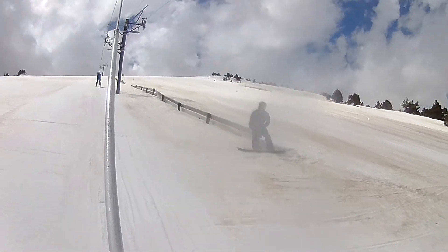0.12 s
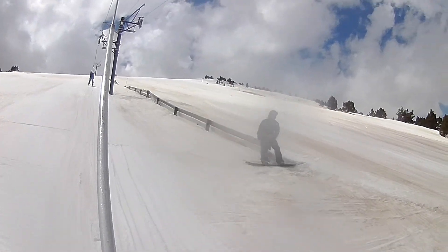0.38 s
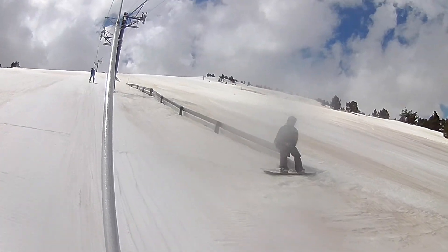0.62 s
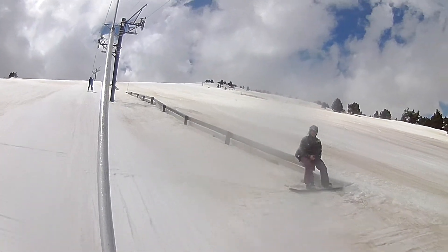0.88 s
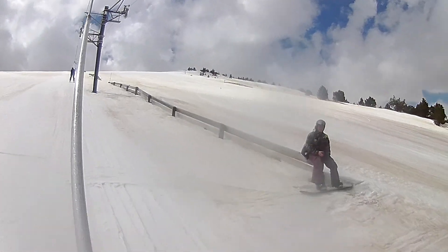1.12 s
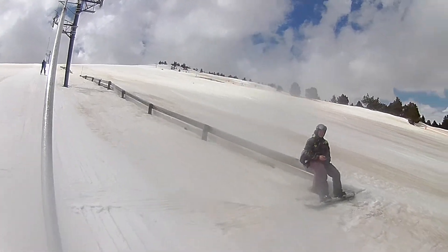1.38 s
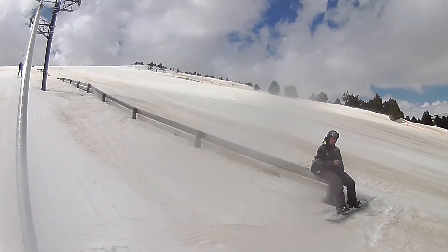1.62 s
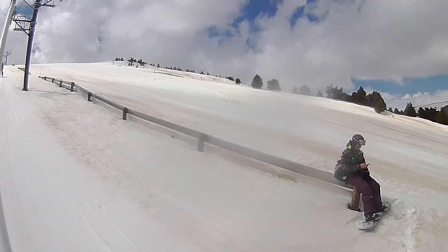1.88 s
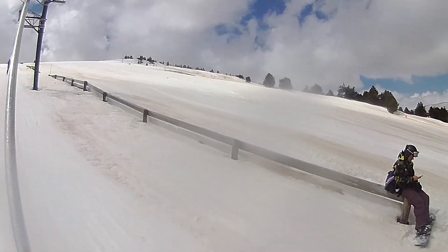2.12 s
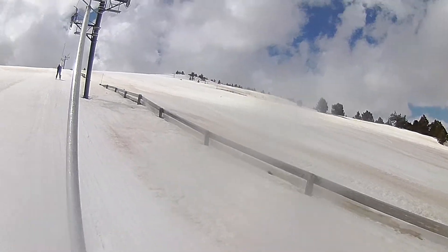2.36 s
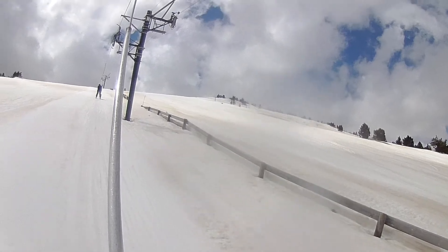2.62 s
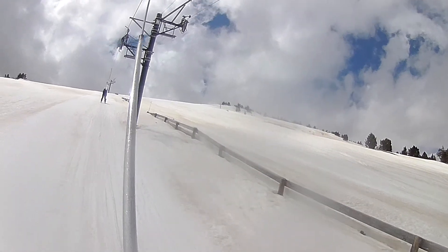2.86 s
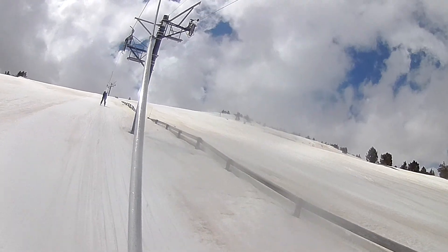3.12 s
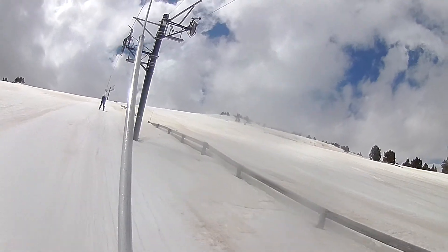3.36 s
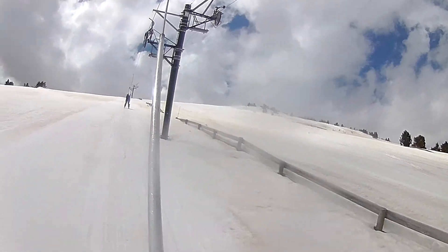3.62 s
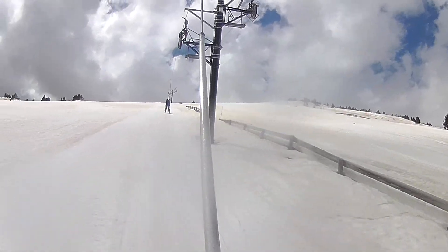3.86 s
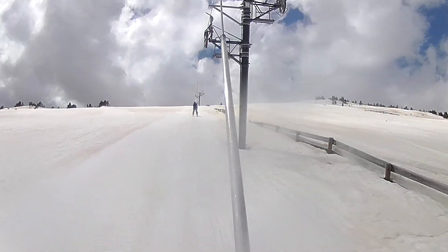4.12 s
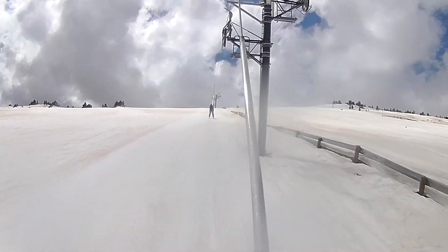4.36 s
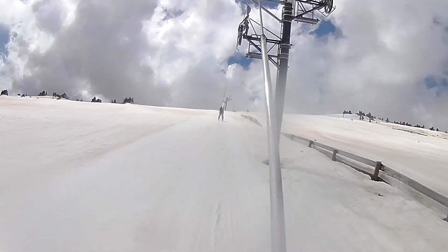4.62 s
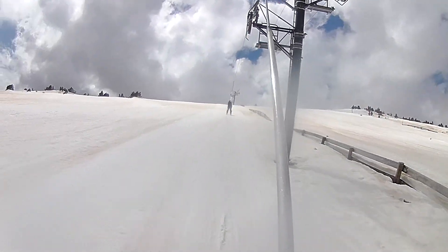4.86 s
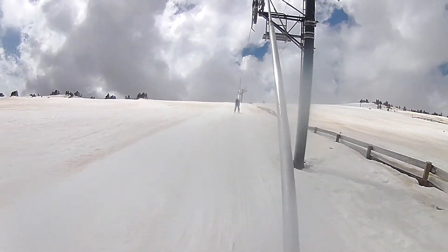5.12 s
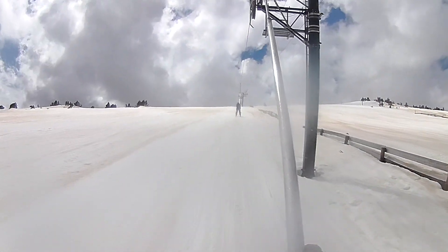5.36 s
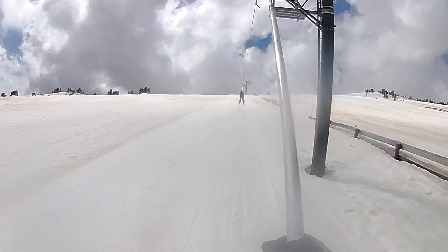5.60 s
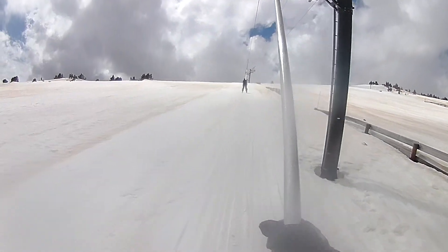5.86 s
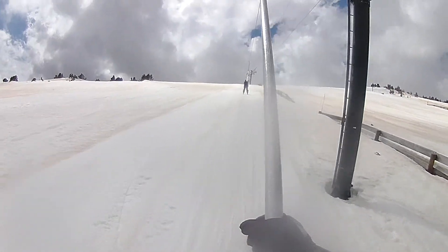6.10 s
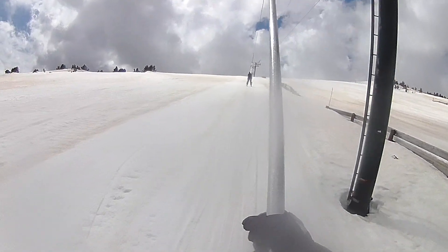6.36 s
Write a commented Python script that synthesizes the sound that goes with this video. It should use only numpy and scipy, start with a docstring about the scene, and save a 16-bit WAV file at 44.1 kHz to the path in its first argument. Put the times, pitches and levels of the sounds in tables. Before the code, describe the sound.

Close, bright snow hiss and scraping continue under a thin metallic tremble. Light rattles come early, sparser ones follow, then a sharp cluster of clanks, a calmer glide and finally a loud rush of rattling, grinding and squeaking near a lift pylon. Behind it lie a faint low lift hum and wide outdoor wash, heard through a housed helmet microphone.

```python
"""A snowy slope under a drag lift: a skier is towed uphill by its metal pole, heard from a housed helmet camera.
The far lift is a narrow noise hum over rumble; skis are shaped noise with grain clicks, plus dull ice knocks.
Friction is clicks in sliding resonances and narrow-noise squeaks.
The loose telescopic pole rattles and clanks, violently near a pylon: strikes and chatter drive decaying modes.
The housing dulls the bass of skis and pole; the treble's stereo width flickers over a wide wash of the slope."""
import sys
import numpy as np
from scipy import signal
from scipy.fft import rfft, irfft
from scipy.io import wavfile
from scipy.ndimage import uniform_filter1d

SR = 44100
rng = np.random.default_rng(int(sys.argv[2]) if len(sys.argv) > 2 else 0)


def store_pcm(level_fs):
    """Save levels as 16-bit WAV."""
    pcm = np.round(np.clip(level_fs, -1, 1) * 32767).astype(np.int16)
    wavfile.write(sys.argv[1], SR, np.atleast_2d(pcm).T)


def voltage_ratio(level):
    """Linear amplitude factor for a level in decibels (scalar or array-like)."""
    return 10 ** (np.asarray(level, float) / 20)


N = 285768


def evened(x):
    """Scales x to rms 1."""
    return x / np.sqrt(np.mean(x ** 2) + 1e-20)


def read(points, hz):
    """Interpolates (Hz, dB) points over log frequency."""
    f, value = np.transpose(points)
    return np.interp(np.log(hz + 1), np.log(f + 1), value)


def add(mix, s, sound):
    """Adds sound into mix at s seconds, cut at the end."""
    part = mix[..., round(s * SR):][..., :sound.shape[-1]]
    part += sound[..., :part.shape[-1]]


def follow(rows, column):
    """One column of a curve for every sample; the end values hold outside it."""
    rows = np.array(rows)
    return np.interp(np.arange(N) / SR, rows[:, 0], rows[:, column])


def clicks(per_s, spread_db):
    """Sparse clicks of random sign; a few are large."""
    size = voltage_ratio(spread_db * np.minimum(rng.exponential(1, N), 4))
    sign = rng.choice([-1., 1.], N)
    return size * sign * (rng.random(N) < per_s / SR)


def struck(modes):
    """Impulse response of decaying modes with a soft start, energy 1; neighbours swing opposite ways."""
    t = np.arange(6000) / SR
    ring = np.zeros(len(t))
    for k, (hz, db, t60_s) in enumerate(modes):
        ring += (-1) ** k * voltage_ratio(db - 60 * t / t60_s) * np.sin(2 * np.pi * hz * t)
    ring = ring * (1 - np.exp(-t / 0.000076))
    return ring / np.linalg.norm(ring)


def coloured(x, spectrum, patchy_db=0., flicker_db=0.):
    """Gives x a spectrum, with drifting patches and a flicker shared by all bands; rms 1."""
    hz, t, z = signal.stft(x, SR, nperseg=512, noverlap=384)
    across_bands = uniform_filter1d(rng.standard_normal(z.shape), 8, 0)
    patches = evened(uniform_filter1d(across_bands, 20, 1))
    flicker = evened(uniform_filter1d(rng.standard_normal(len(t)), 8))
    z = z * voltage_ratio(read(spectrum, hz)[:, None] + patchy_db * patches + flicker_db * flicker)
    return evened(signal.istft(z, SR, nperseg=512, noverlap=384)[1][:N])


def resonate(x, hz, width_hz):
    """A moving resonance of gain 1: shift down, smooth, shift back."""
    turn = np.exp(2j * np.pi * np.cumsum(hz) / SR)
    r = np.exp(-np.pi * width_hz / SR)
    return 2 * (turn * signal.lfilter([1 - r], [1, -r], x / turn)).real


# Far drive of the lift. One row: centre in Hz, half-width at half amplitude in Hz, rms level in dB.
DRIVE_HUM = (100.5, 18.7, -74)
RUMBLE_DB = -83.5


def lift():
    """Noise in a narrow low resonance wavers as a hum, over faint rumble; the two channels are unrelated."""
    hz, width_hz, db = DRIVE_HUM
    f = np.fft.rfftfreq(N, 1 / SR)
    hum_noise, rumble_noise = rfft(rng.standard_normal((2, 2, N)))
    hum = evened(irfft(hum_noise / (1 + ((f - hz) / width_hz) ** 2), N))
    rumble = evened(irfft(rumble_noise / (1 + (f / 70) ** 3), N))
    return voltage_ratio(db) * hum + voltage_ratio(RUMBLE_DB) * rumble


# Wash of the slope. Each row: frequency in Hz, relative density in dB per Hz.
OPEN_AIR_SPECTRUM = [(120, -25), (300, -12.5), (700, -2), (1300, -1.5), (2300, -6), (3500, -13),
                     (6000, -40)]
OPEN_AIR_DB = -59.5


def open_air():
    """Steady shaped noise of the open slope, for the side signal."""
    wash = coloured(rng.standard_normal(N), OPEN_AIR_SPECTRUM, patchy_db=1.5, flicker_db=0.9)
    return voltage_ratio(OPEN_AIR_DB) * wash


# The ride, also followed by the pole.
# Each row: time in s, hiss rms in dB, crunch rms in dB, drive of the pole's tremble in dB.
RIDE = [(0.0, -43.5, -47, -42), (0.24, -43.5, -47, -47.5), (0.41, -41.5, -50, -45.5),
        (0.6, -46.5, -48.5, -50.5), (0.81, -41.5, -46, -46.5), (0.94, -40, -51.5, -46),
        (1.04, -51.5, -51, -52.5), (1.22, -46.5, -52.5, -52.5), (1.45, -42, -46, -44.5),
        (1.75, -43.5, -46, -45.5), (2.11, -45.5, -49.5, -55), (2.5, -40.5, -47.5, -46.5),
        (2.94, -42.5, -51, -48.5), (3.16, -40.5, -49, -71), (3.32, -40, -47, -57),
        (3.47, -40.5, -43.5, -50), (3.58, -42.5, -48.5, -48.5), (3.79, -40.5, -50.5, -50.5),
        (4.37, -42, -48, -44), (5.03, -43, -49.5, -45.5), (5.7, -43, -49.5, -43.5), (5.93, -39, -43, -39),
        (6.012, -37, -36.5, -29.5), (6.14, -46, -52.5, -36.5), (6.25, -48, -44, -41),
        (6.36, -51, -46.5, -37), (6.48, -33.5, -44, -32.5)]
# Fine grains, steel edges, packed snow under the ski.
# Each row: frequency in Hz, relative density in dB per Hz.
HISS_SPECTRUM = [(2240, -25.5), (3800, -12.5), (4280, -18.5), (5650, -8), (6220, -5), (7120, -10.5),
                 (8770, -9), (10300, -12), (11800, -2), (13200, -11.5), (14700, -7.5), (15700, -21.5)]
SCRAPE_SPECTRUM = [(1800, -25), (2400, -10), (2900, 2), (3600, -1.5), (4300, -1), (5200, -14)]
CRUNCH_SPECTRUM = [(88, -63), (150, -20), (334, -13), (472, -8), (699, -5.5), (965, -4.5), (1450, 0.5),
                   (2600, -5), (3380, -18), (5720, -120)]
USUAL_CRUNCH_DB, USUAL_TREMBLE_DB = -48, -46
# edges scrape harder when snow crunches and the ride shakes: dB gained per dB
SCRAPE_DB, SCRAPE_PER_CRUNCH, SCRAPE_PER_TREMBLE = -53, 0.54, 0.7


def snow():
    """Smooth sliding noise with breaking grains in it: bright hiss, scrape and a duller crunch."""
    grains = evened(clicks(per_s=3000, spread_db=4.0))
    hiss = coloured(rng.standard_normal(N) + 0.43 * grains, HISS_SPECTRUM, patchy_db=1.37, flicker_db=1.18)
    scrape = coloured(rng.standard_normal(N) + 0.43 * grains, SCRAPE_SPECTRUM, patchy_db=0.1, flicker_db=1.5)
    crunch = coloured(rng.standard_normal(N) + 0.79 * grains, CRUNCH_SPECTRUM, patchy_db=1.04, flicker_db=0.9)
    hiss_db, crunch_db, tremble_db = (follow(RIDE, column) for column in (1, 2, 3))
    scrape_db = (SCRAPE_DB + SCRAPE_PER_CRUNCH * (crunch_db - USUAL_CRUNCH_DB)
                 + SCRAPE_PER_TREMBLE * (tremble_db - USUAL_TREMBLE_DB))
    return voltage_ratio(hiss_db) * hiss + voltage_ratio(crunch_db) * crunch + voltage_ratio(scrape_db) * scrape


# Ski edges on lumps of ice. Each row: start in s, level before decay in dB, frequency in Hz.
ICE_LUMPS = [(0.057, -31.5, 596), (0.093, -26, 1410), (0.616, -33, 1330), (1.09, -38, 1640),
             (1.634, -32, 1110), (2.584, -33, 1680), (5.874, -28, 2300), (5.915, -22.5, 1790),
             (5.975, -28, 430), (5.992, -32, 340)]


def lumps():
    """Ski edges hit ice: each knock is a sine with a fast rise and decay."""
    out, t = np.zeros(N), np.arange(800) / SR
    for s, db, hz in ICE_LUMPS:
        decay = voltage_ratio(db - 60 * t / .011)
        rise = np.minimum(t / .0005, 1)
        add(out, s, decay * rise * np.sin(2 * np.pi * hz * t))
    return out


# Hollow grinding strokes. Each row: start in s, length in s, rms level at the crest in dB,
# share of the length spent swelling, start pitch in Hz, end pitch in Hz.
GRIND_STROKES = [(2.81, 0.18, -47.5, 0.48, 3300, 3500), (5.892, 0.1, -33.5, 0.8, 1800, 1110),
                 (6.185, 0.085, -40, 0.12, 2000, 1310), (6.258, .17, -42.5, 0.37, 1000, 744)]
GRIND_ENDS_DB = -18.5  # against the crest
# Metal on metal. Each row: start in s, level before rise and decay in dB, frequency in Hz.
METAL_SQUEAKS = [(1.3533, -35, 13800), (1.4092, -42.5, 14000), (5.873, -26, 14000), (5.9294, -27, 14000)]
SQUEAK_RISE_S, SQUEAK_T60_S = 0.0077, 0.067


def rubbing():
    """Rough friction through a sliding hollow resonance, and short narrow squeaks."""
    out, rough = np.zeros(N), clicks(per_s=1400, spread_db=3.0)
    for s, length_s, db, swell, start_hz, end_hz in GRIND_STROKES:
        u = np.linspace(0, 1, round(length_s * SR))
        pitch_hz = start_hz * (end_hz / start_hz) ** u
        friction = rough[round(s * SR):][:len(u)]
        hollow = resonate(resonate(friction, pitch_hz, width_hz=660), pitch_hz, width_hz=1300)
        away = np.interp(u, [0, np.clip(swell, .05, .95), 1], [1, 0, 1])  # 0 at the crest
        add(out, s, voltage_ratio(db + GRIND_ENDS_DB * away ** 2) * evened(hollow))
    t = np.arange(4000) / SR
    for s, db, hz in METAL_SQUEAKS:
        narrow = evened(resonate(rng.standard_normal(len(t)), hz + 0 * t, width_hz=350))
        add(out, s, voltage_ratio(db - 60 * t / SQUEAK_T60_S) * np.minimum(t / SQUEAK_RISE_S, 1) * narrow)
    return out


# Modes of the pole in four families. Each row: frequency in Hz, relative level in dB, t60 in s.
KNOCK_MODES = [(1250, -1, 0.01), (1600, -11, 0.0017), (2000, -15, 0.0016), (2580, 21, 0.0029),
               (3130, -6, 0.0084), (3300, 12.5, 0.0035), (4030, 0, 0.0033), (7500, -22, 0.0017),
               (9150, 5, 0.00099), (10500, 1, .002), (15000, -5, .002)]
CLANK_MODES = [(4870, 2.5, 0.005), (5105, -1, 0.013), (5370, 0.5, 0.005), (5590, -0.5, 0.0085),
               (5654, 7, 0.0062), (6110, 7, 0.0068), (6153, 2.5, 0.015), (6746, -9, 0.012),
               (7310, -6, 0.0069), (8020, -11.5, 0.0068), (8310, -12.5, 0.007), (9220, -13, 0.005)]
TINKLE_MODES = [(11900, 1, 0.011), (12500, -12, .005), (13000, 16, 0.0066), (12900, -9, .008),
                (13700, 7.5, 0.0071), (14100, -16, 0.011), (14300, -25, .004)]
RING_MODES = [(4628, 0, .09), (12830, -5, .05)]
# Strikes of the loose parts. Each row: start in s, first contact in dB,
# knock, tinkle and ring in dB against the clank, chatter t60 in s.
STRIKES = [(0.0366, -27, -16, -1, -13, 0.086), (0.12, -25, -10, -10, -17, 0.035),
           (0.2172, -32, -18, -8, 2, 0.066), (0.605, -28, -25, -1, 1, 0.088),
           (0.6816, -19, -12, -8, -6, 0.037), (0.759, -28, -18, -17, -12, .08),
           (1.266, -31, -14, -2, -5, .06), (2.588, -34, -3, 9, -15, .05), (3.1386, -27, -11, -11, -20, .06),
           (3.2915, -26, -8, -3, -18, 0.067), (3.448, -28, -13, -12, -21, .07),
           (4.1275, -21, -20, -19.5, -30, .06), (4.1337, -20.5, -22, -12, -25, 0.09),
           (4.212, -21.5, -11, -15, -22, 0.055), (4.3, -28, -5, -15, -20, 0.091),
           (4.39, -14, -25, -18, -32, .04), (4.4768, -12.5, -24, -16, -30, .045),
           (4.5024, -27, -22, -20, -24, 0.055), (4.56, -18, -16.5, -17, -24, .05),
           (5.239, -28, -25, -16, -2, .06), (5.9292, -22, -3, -12, -15, 0.073),
           (5.9564, -16.5, -8, -12, -1, 0.18), (5.9934, -8.5, -7.5, -5, -9, .07),
           (6.0043, -8.5, -11, -13, -21, .06), (6.017, -24, -18, -8, 8, 0.061),
           (6.0465, -12, -18, -5, -17, 0.032), (6.0489, -8, -20, -2, -13, 0.029),
           (6.0708, -19, 0, -10, -11, 0.073), (6.1466, -11.5, -14.5, -14, -23, .02),
           (6.149, -8, -9, -16, -30, .02), (6.1568, -10, -11.5, -4, -18, 0.016),
           (6.1604, -11.5, -12, 1, -3.5, 0.019), (6.1967, -33, 4, -11, 11, 0.1),
           (6.276, -20.5, -2, -9, -16, 0.027), (6.279, -11.5, -6, -4.5, -7.5, 0.11),
           (6.338, -26, -2, 0, -6, .06), (6.3444, -23.5, -8, 7, -4, 0.027),
           (6.3837, -10, -7.5, 2, 2, 0.051), (6.413, -24, -19, -10, 5, 0.021),
           (6.443, -29, 0, -1, 3, 0.089)]
# Chatter against first contact. One row: knock, clank, tinkle, ring, all in dB.
CHATTER_LEVELS = [-16, -13.5, -10, -12.5]
CONTACT_RISE_S, CONTACT_FALL_S, CHATTER_RISE_S = .0003, .001, 0.0058
REBOUND_S, REBOUND_DB = 0.00997, -13.5  # one weaker second strike
TREMBLE_RING_DB = -19  # ring against the tremble
SHUDDER_DB, SHUDDER_PER_TREMBLE = -59.5, 1.75  # tinkle drive at usual tremble, dB gained per dB
CUT_ON_HZ = 4580  # the tube carries little clank below this


def pole():
    """Loose parts strike, rebound, chatter briefly and tremble; each family of modes takes its share."""
    strikes, drive, t = np.zeros((4, N)), np.zeros((4, N)), np.arange(5000) / SR
    contact = np.exp(-t / CONTACT_FALL_S) * np.minimum(t / CONTACT_RISE_S, 1)
    for s, db, knock_db, tinkle_db, ring_db, t60_s in STRIKES:
        chatter = voltage_ratio(np.c_[CHATTER_LEVELS] - 60 * t / t60_s) * np.minimum(t / CHATTER_RISE_S, 1)
        shares = voltage_ratio(db + np.c_[[knock_db, 0, tinkle_db, ring_db]])
        add(strikes, s, shares * contact)
        add(strikes, s + REBOUND_S, shares * voltage_ratio(REBOUND_DB) * contact)
        add(drive, s, shares * chatter)
    tremble_db = follow(RIDE, column=3)
    drive[1] += voltage_ratio(tremble_db)
    drive[2] += voltage_ratio(SHUDDER_DB + SHUDDER_PER_TREMBLE * (tremble_db - USUAL_TREMBLE_DB))
    drive[3] += voltage_ratio(tremble_db + TREMBLE_RING_DB)
    rough_contact = strikes * rng.choice([-1., 1.], N)  # random sign at every sample
    force = rough_contact + drive * evened(clicks(per_s=11000, spread_db=4.0))
    families = (KNOCK_MODES, CLANK_MODES, TINKLE_MODES, RING_MODES)
    knock, clank, tinkle, ring = (struck(modes) for modes in families)
    clank = signal.sosfilt(signal.butter(6, CUT_ON_HZ, "high", fs=SR, output="sos"), clank)
    return signal.fftconvolve(force, [knock, clank, tinkle, ring], axes=1)[:, :N].sum(0)


# Dull bass and a dip near 1 kHz from the sealed case; apart from that, the treble ends steeply near 15.7 kHz. #
# Each row: frequency in Hz, gain in dB.
BAND_RESPONSE = [(30, -24), (150, -12), (320, 0), (975, 2), (1000, -15), (1025, 0.5), (4000, -0.5),
                 (4230, -0.5), (4500, 0.5), (15400, 1), (15750, -14)]


def housing(x):
    """The case dulls the bass, with a dip near 1 kHz; apart from that, the treble ends steeply near 15.7 kHz."""
    gain = voltage_ratio(read(BAND_RESPONSE, np.fft.rfftfreq(N, 1 / SR)))
    return irfft(rfft(x) * gain, N)


# Flickering side. Each row: frequency in Hz, side against mid in dB before flicker and a fixed doubling.
SIDE_LEVELS = [(1500, -21.5), (3000, -15), (5000, -16), (15000, -16)]


def flickering_width(wide, centred):
    """A phase-scrambled copy of flickering level and the wash form the side; centred sounds feed it less."""
    hz, t, z = signal.stft(wide + voltage_ratio(-6) * centred, SR, nperseg=256, noverlap=192)
    flicker = evened(uniform_filter1d(rng.standard_normal(len(t)), 20))
    flicker_db = 4 * np.tanh(flicker)  # stays within 4 dB
    scrambled = z * np.exp(2j * np.pi * rng.random(z.shape))
    scrambled = scrambled * 2 * voltage_ratio(read(SIDE_LEVELS, hz)[:, None] + flicker_db)
    side = signal.istft(scrambled, SR, nperseg=256, noverlap=192)[1][:N]
    side = side + open_air()
    return wide + centred + np.array([side, -side])


def scene():
    """Skis and pole pass the housing, the pole with less stereo flicker; the lift is added unfiltered."""
    skis = housing(snow() + lumps())
    metal = housing(pole() + rubbing())
    return flickering_width(skis, metal) + lift()


def roll_off(x):
    """The treble ends steeply here."""
    return signal.sosfilt(signal.butter(12, 15820, fs=SR, output="sos"), x)


def record(dry):
    """Delivers the finished mix."""
    return roll_off(dry)


dry = scene()
out = record(dry)
store_pcm(out)
```